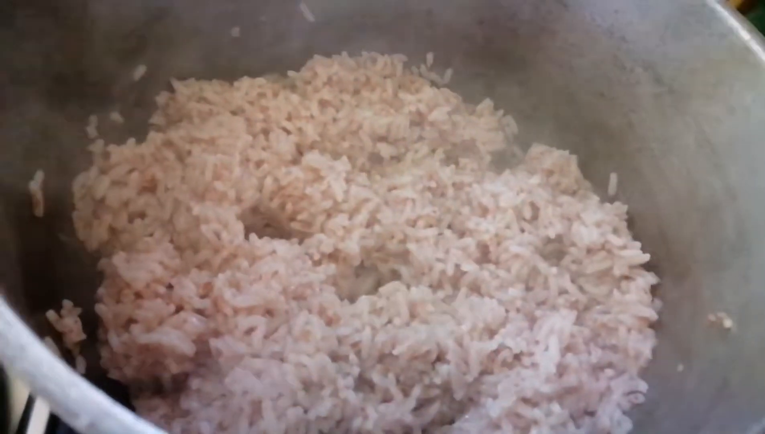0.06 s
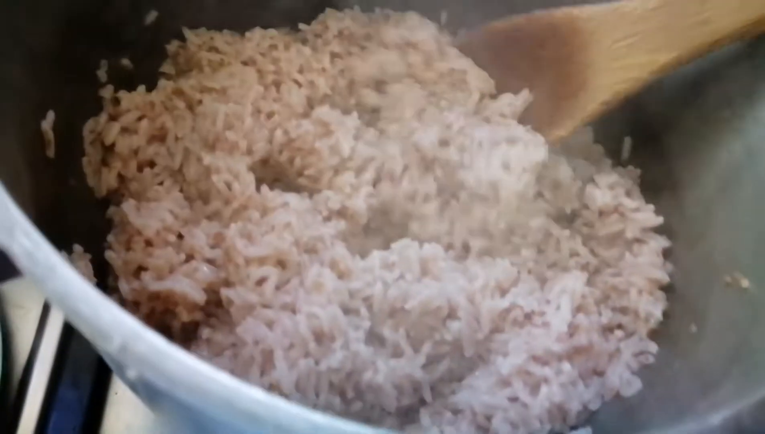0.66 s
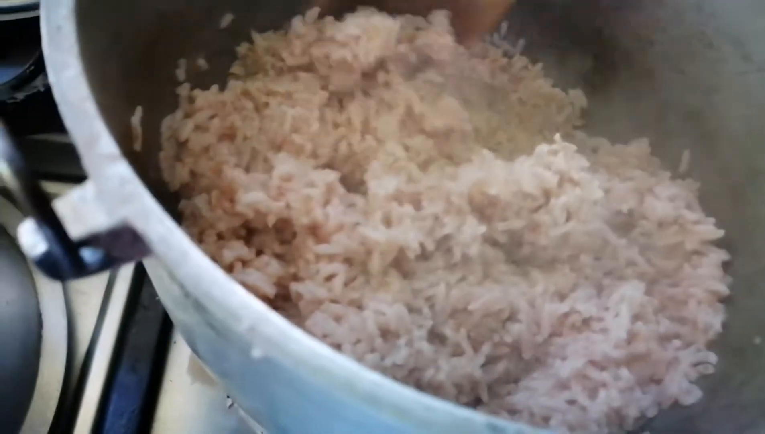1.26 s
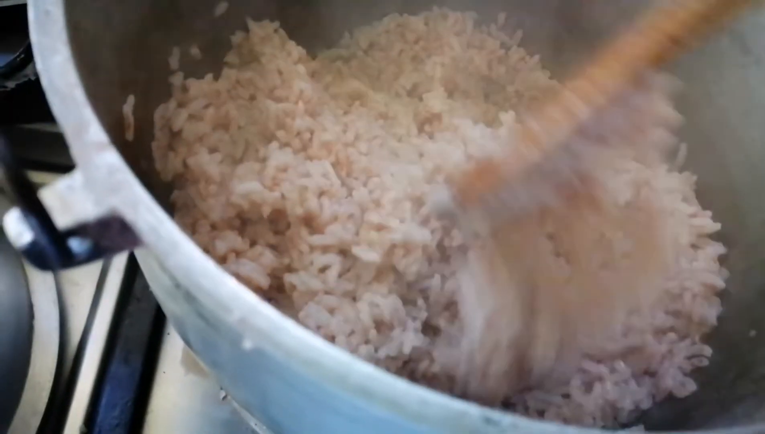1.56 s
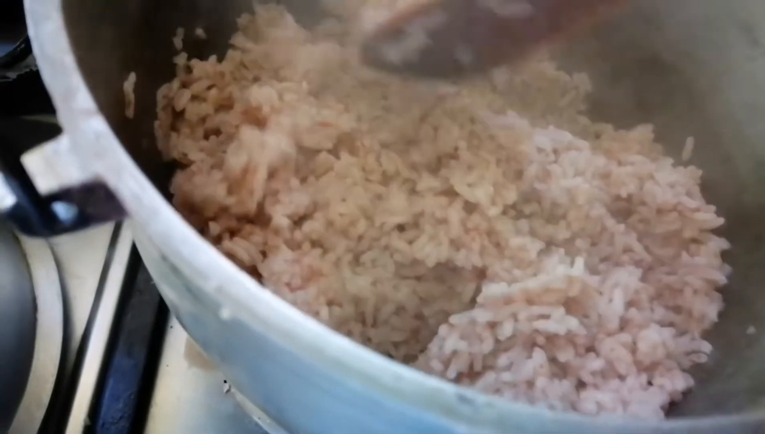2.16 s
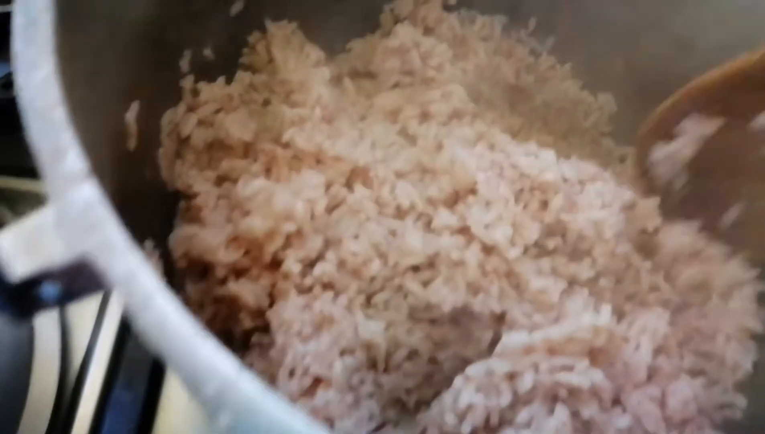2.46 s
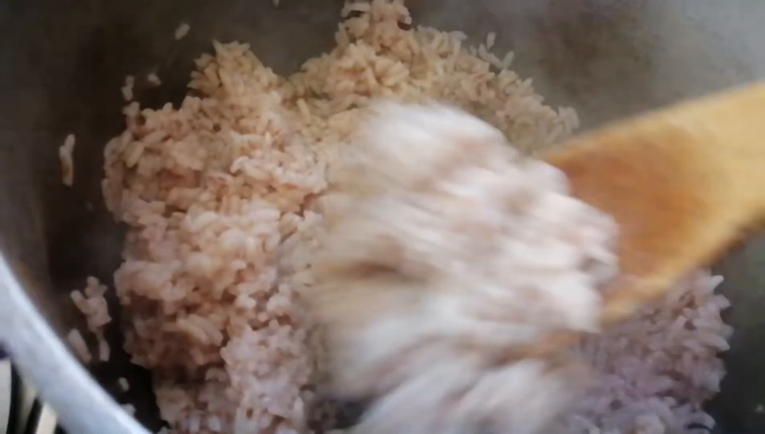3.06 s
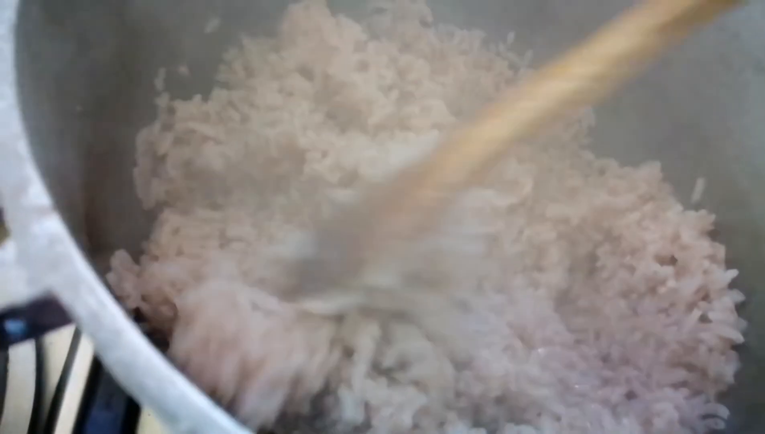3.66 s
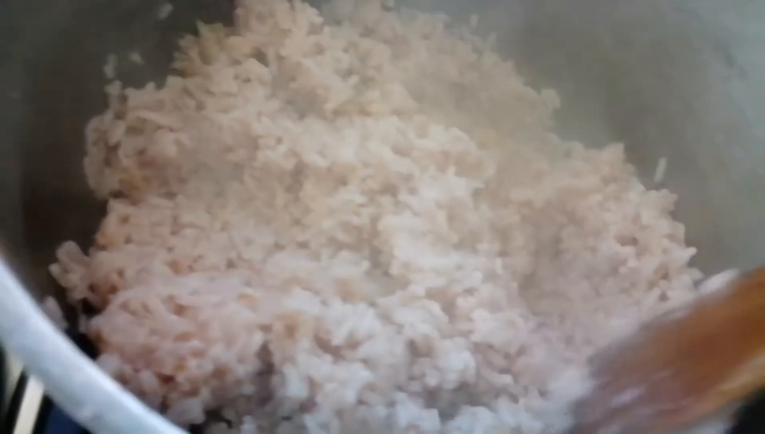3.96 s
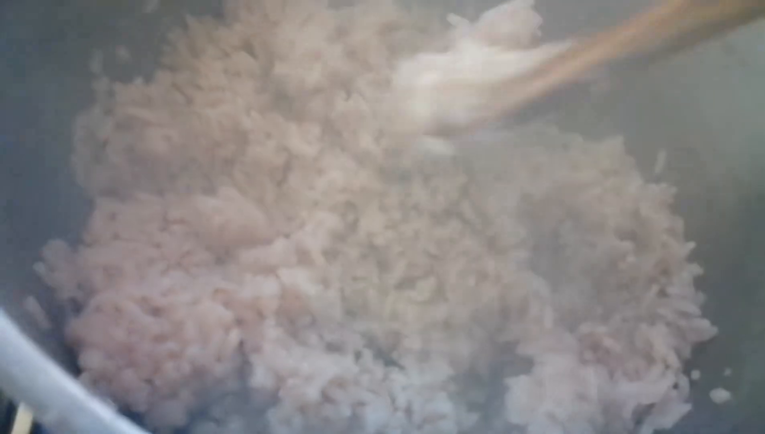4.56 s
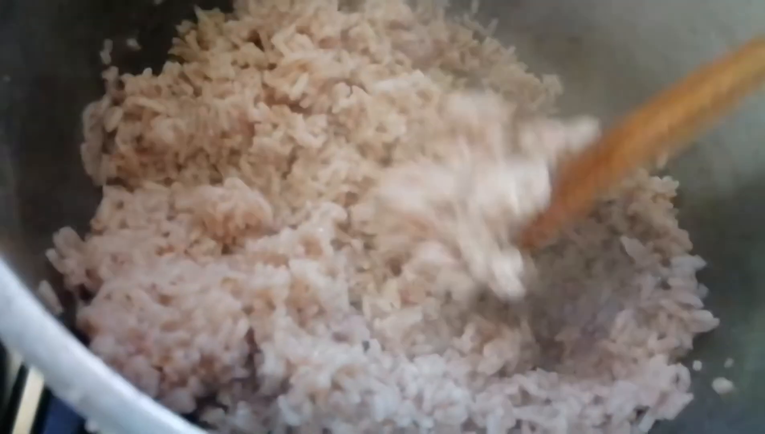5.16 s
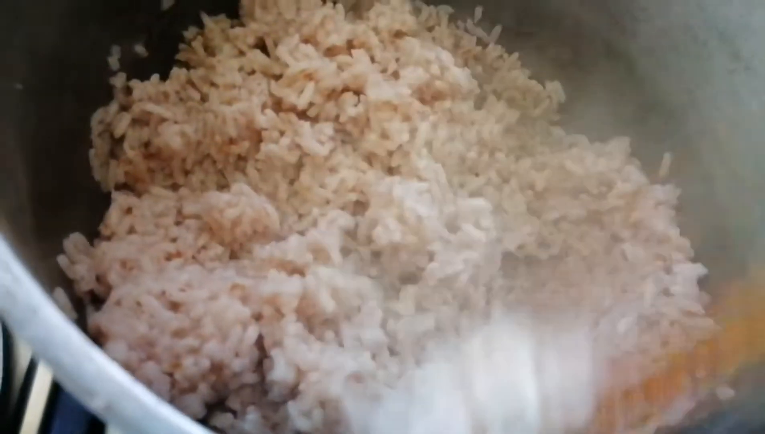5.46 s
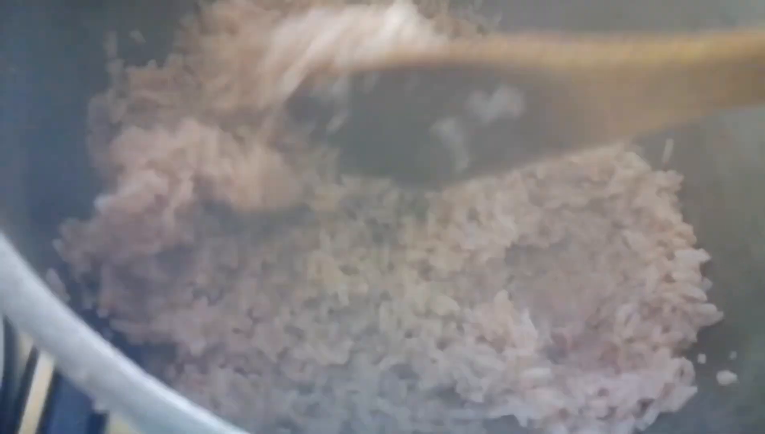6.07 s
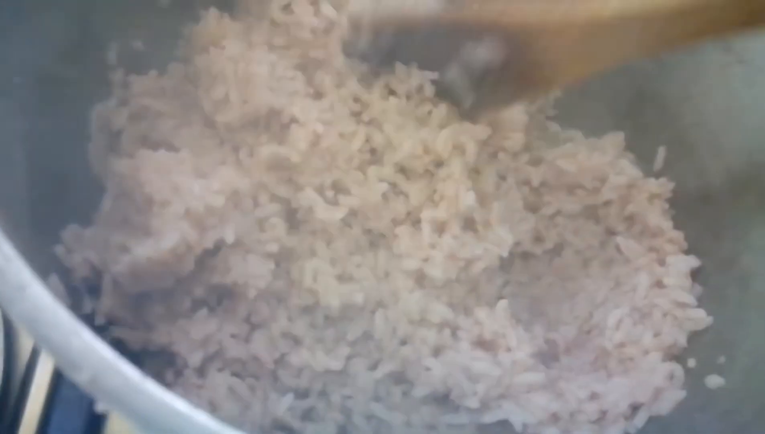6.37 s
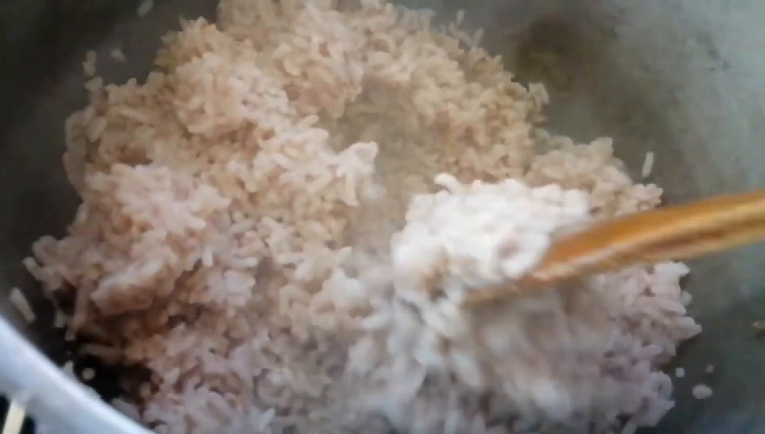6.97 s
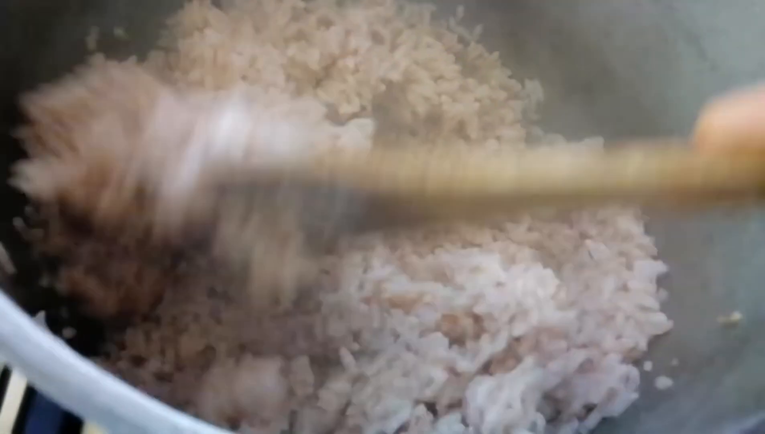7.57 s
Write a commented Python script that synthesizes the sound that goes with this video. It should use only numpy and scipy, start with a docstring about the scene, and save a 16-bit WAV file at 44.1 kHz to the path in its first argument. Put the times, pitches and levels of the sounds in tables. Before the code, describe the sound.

Damp rice sizzles in a large metal pot on a stove, a steady steamy hiss with fine crackle and small wet pops. A wooden spoon turns the rice, bumping the pot dully a few times. Just past the middle comes one sharp knock with a brief skid, and the hiss dips for a moment. Softer bumps and scrapes follow as the pot settles and the sputter eases slightly. The microphone is close to the pot.

```python
"""Damp rice sizzles in a large metal pot on a stove, close to a pair of microphones.
From the start, steam and bursting droplets lay a bed of hiss, dotted with wet pops of starch.
A wooden spoon turns the rice, bumping the pot at 0.3, 2.0 and 2.5 s. At 4.8 s one hard knock skids
along the wall and makes the gain control duck. Softer bumps and scrapes follow, the pot rocks and
settles, and the sputter keeps easing off as the rice dries."""
import sys
import numpy as np
from scipy import signal
from scipy.fft import rfft, irfft
from scipy.io import wavfile
from scipy.ndimage import uniform_filter1d

SR = 44100
rng = np.random.default_rng(int(sys.argv[2]) if len(sys.argv) > 2 else 0)


def to_wav(s):
    """Save 16-bit WAV."""
    ch = np.atleast_2d(s).T  # columns
    pcm = np.round(np.clip(ch, -1, 1) * 32767)  # PCM
    wavfile.write(sys.argv[1], SR, pcm.astype(np.int16))


N = 344421
TIME, FREQS = np.arange(N) / SR, np.fft.rfftfreq(N, 1 / SR)
RIGHT_MIC_LAG_S = 22 / SR

# The broad tone of the hiss. Each row: frequency in Hz, left and right density in dB per Hz.
HISS_TONE = [(25.0, -94.5, -107.5), (103, -92, -96), (300.0, -95.5, -102.4), (730, -91.5, -95),
             (1320, -88, -96.5), (2240, -88, -94), (3800, -85, -93), (4860, -78.5, -89),
             (6330, -79.5, -83.5), (7560, -82.0, -89.5), (9520, -83.5, -97.5), (10570, -90, -99.8),
             (14100, -99.5, -102.2), (15400, -96.5, -101.5)]
# Resonances and notches of the pot's hollow and the microphone ports.
# Each row: centre in Hz, width in Hz, left and right gain in dB.
HOLLOW_RESONANCES = [(144.4, 43, 4.5, 3.5), (397, 46, 4.5, -5), (532.7, 11.4, 9.5, 6.5), (720, 71, 0, 0.5),
                     (1050, 106, 3, 3.5), (1200, 140, -2.5, 1), (1480, 55, 3.5, -3), (1680, 260, 0.5, -0.5),
                     (1878, 130, 5, -3.5), (1980, 250, -3, 3.5), (2650, 67, -5, -6.5), (2740, 450, 6.5, 5),
                     (2998, 78, 5.5, 0), (3300, 750, 3, 6.5), (3860, 290, -2.5, 0.5), (4320, 450, 2.5, 3.5),
                     (4570, 130, -2.5, -0.5), (4790, 300, 2, 2.5), (5080, 55, 7.5, -1), (5400, 116, 4, 6),
                     (6460, 200, -2, -3), (7030, 780, 3.5, 9.5), (8360, 1060, 9, 0.5), (9400, 380, -2.5, 2),
                     (9750, 700, 0, 2.5)]
# How alike the steam is at both microphones. Each row: frequency in Hz, likeness from 0 to 1.
STEAM_LIKENESS = [(30, .5), (170, .85), (450, .62), (850, .2), (1500, .45), (2500, .2), (4700, .28),
                  (6500, .06), (14000, .05)]
# The slow ride of the frying. Each row: time in seconds, level in dB, lean to the left in dB.
FRYING_RIDE = [(0, -0.2, 0.5), (0.45, 0.75, -1), (1.2, 0, 1.2), (2.4, 0, 1.3), (3.9, 0, 0.8), (5.4, 0.1, 0),
               (6.6, 0.5, 0.5), (7.8, 0.5, 0)]
# The sizzle flares where turned rice meets hot metal and ebbs under the spoon.
# Each row: middle in seconds, length in seconds, fizz gain in dB, sputter gain in dB.
STIR_SWELLS = [(0.933, 0.36, 1, 1), (1.165, 0.15, 1.5, 0), (1.514, 0.12, 1, 1.5), (1.65, 0.15, -.3, -2.5),
               (1.76, .12, 0, 0.5), (2.30, 0.075, .5, 1.7), (3.273, .26, 0, -1.5), (3.582, 0.091, 2, 1),
               (3.84, 0.35, -.3, -1.5), (5.42, .12, -0.2, -2), (5.55, 0.11, 1.5, 0),
               (6.106, 0.093, -1.2, -4), (6.31, 0.22, 1, -1.5), (7.194, 0.43, -0.3, 0.9),
               (7.45, 0.12, -2, -1), (7.588, 0.26, .2, 1.5)]
# Narrow dips in the sizzle's tone. Each row: centre in Hz, width in Hz, usual depth from 0 to 1.
DRIFTING_DIPS = [(696, 174, 0.55), (1227, 190, 0.27)]
# The largest wet pops of sticky rice. Each row: start in seconds, level in dB, pitch in Hz.
BIG_POPS = [(0.3116, -38, 2300), (0.3492, -40, 2300), (0.838, -35, 2700), (3.809, -43, 2400),
            (3.9841, -35.5, 1620), (4.1051, -39, 2190), (4.1958, -34, 2030), (4.661, -39, 2800),
            (5.155, -38, 2720), (5.3254, -37, 2760), (5.8552, -42, 1740), (5.9897, -36, 2600),
            (6.067, -42, 1750), (7.62, -46, 1660)]
# The ring of the loaded pot. Each row: pitch in Hz, left and right gain in dB, seconds to fall 60 dB.
RING_MODES = [(160.3, 2, -1, 0.29), (207.6, -5, -9.5, 0.314), (254.3, -5.5, -13, 0.13), (321, -8, -4, 0.14),
              (400, -6, -8, 0.12), (546, 0, -10, 0.16), (600, -9, 2, 0.1), (1096, -0.5, 11, 0.092),
              (1240, 0, -2, 0.03), (1660, 8, -5, 0.16), (2040, 22, -14, 0.055), (2490, 21, 2, 0.04),
              (2850, 5, -14, 0.05), (2950, 21, -13, 0.055)]
# The pot settles on the stove. Each row: start in seconds, strength in dB, pitch rise of the ring in Hz.
POT_ROCKS = [(4.902, -47.5, 6.5), (5.637, -51, 5), (6.822, -55, 1), (7.446, -53, 2.5), (7.492, -49, 0)]
# The spoon drags over metal and rice, with a row for every band a stroke excites.
# Each row: start in seconds, length in seconds, band gain in dB, lower and upper edge in Hz.
SPOON_SCRAPES = [(0.269, 0.064, 6, 540, 700), (1.96, 0.3, 3, 140, 330), (2.01, 0.1, 5, 450, 700),
                 (4.8217, 0.029, 10.5, 1900, 15000), (4.823, 0.013, 16, 1900, 3300),
                 (4.821, 0.026, 10, 4600, 5500), (4.825, 0.015, 21.5, 7740, 8750),
                 (4.8255, 0.011, 20, 10800, 15000), (5.543, 0.016, 12.5, 780, 1330),
                 (7.505, 0.19, 7, 140, 330), (7.517, 0.09, 1, 380, 1200)]
# The spoon hits the pot. Each row: start in seconds, strength in dB, contact brightness in Hz,
# tick level in dB, clack level in dB, clack pitch in Hz, thud in dB relative to the strength,
# thud pitch in Hz, pitch rise of the ring in Hz, share of the ring time that the resting spoon leaves.
SPOON_KNOCKS = [(0.261, -53, 650, -40, -50, 580, -5, 190, -0.5, 1.0),
                (2.023, -62, 600, -59, -51, 620, -2, 220, 1, 1.0),
                (2.4709, -44, 380, -28, -40, 1050, -18, 180, 2, 0.8),
                (4.8206, -49.5, 2100, -14.5, -34, 740, 3.5, 280, 5, 1.0),
                (5.5405, -46.5, 980, -35, -45.5, 483, -2.5, 210, 5, 0.87),
                (7.2684, -60, 1000, -50, -44, 470, 0, 210, 0, 0.92)]


def amp(db):
    return 10 ** (np.asarray(db) / 20)


def unit_rms(x):
    return x / np.sqrt(np.mean(x ** 2) + 1e-20)


def curve(table, hz, column=1):
    """One column of a table, joined by straight lines on a log-frequency axis."""
    table = np.array(table)
    return np.interp(np.log(hz + 1), np.log(table[:, 0]), table[:, column])


def add(mix, start_s, sound):
    part = mix[:, round(start_s * SR):][:, :sound.shape[-1]]
    part += sound[..., :part.shape[1]]


def band(x, low_hz, top_hz):
    return signal.sosfilt(signal.butter(2, [low_hz, top_hz], "band", fs=SR, output="sos"), x)


def wander(rate_hz):
    """Random modulation of unit size, from 3 Hz up to about the given rate."""
    spectrum = rfft(rng.standard_normal(N)) * (FREQS > 3) / (1 + (FREQS / rate_hz) ** 2)
    return unit_rms(irfft(spectrum, N))


def pot_hollow(x, size=2 ** 13):
    """Colours white sound as it travels out of the pot to each microphone."""
    hz = abs(np.fft.fftfreq(size, 1 / SR))
    db = np.array([curve(HISS_TONE, hz, column=1), curve(HISS_TONE, hz, column=2)])
    for centre, width, left, right in HOLLOW_RESONANCES:
        db += np.array([[left], [right]]) / (1 + (2 * (hz - centre) / width) ** 2)
    minimum_phase = np.exp(np.conj(signal.hilbert(np.log(amp(db)))))
    taps = np.fft.ifft(minimum_phase).real[:, :size // 2]
    return signal.oaconvolve(x, taps * np.sqrt(SR / 2), axes=1)[:, :N]


def wall_bounces(t60, direct):
    """The path from one spot: a direct click, later on the right, and scatter between the walls."""
    t = TIME[:SR // 10]
    taps = rng.standard_normal((2, len(t))) * amp(-60 * t / t60)
    taps /= np.linalg.norm(taps, axis=1, keepdims=True)
    taps[0, 0] += direct
    taps[1, round(RIGHT_MIC_LAG_S * SR)] += direct
    return taps / np.hypot(1, direct)


def drifting_dips(x, drift=.05, depth_spread=.4, knots_per_s=5):
    """Narrow dips in the sizzle near 700 and 1230 Hz that slide, deepen and fill in."""
    for hz, width, depth in DRIFTING_DIPS:
        knots = rng.standard_normal((2, (N // SR + 1) * knots_per_s + 1))
        slide, fade = (np.interp(TIME * knots_per_s, np.arange(len(row)), row) for row in knots)
        carrier = np.exp(2j * np.pi * np.cumsum(hz * (1 + drift * slide)) / SR)
        pole = np.exp(-np.pi * width / SR)
        dip_band = 2 * (carrier * signal.lfilter([1 - pole], [1, -pole], x / carrier)).real
        x = x - np.clip(depth + depth_spread * fade, 0, 1) * dip_band
    return x


def steam():
    """A smooth rush of vapour, partly alike at the two microphones."""
    left, unrelated = rfft(rng.standard_normal((2, N)))
    likeness = curve(STEAM_LIKENESS, FREQS)
    lag = np.exp(-2j * np.pi * FREQS * RIGHT_MIC_LAG_S)
    right = likeness * left * lag + np.sqrt(1 - likeness ** 2) * unrelated
    return irfft(np.array([left, right]), N)


def droplets(per_s, clump_db, t60, direct, spread_db=3.5, spots=12):
    """Droplets burst in spurts at several spots on the hot metal; most are tiny, a few are large."""
    rate = per_s * amp(clump_db * wander(rate_hz=40))
    size = amp(spread_db * np.minimum(rng.exponential(1, N), 4.5)) * rng.choice([-1, 1], N)
    clicks = size * (rng.random(N) < rate / SR)
    spot = rng.integers(0, spots, N)
    crackle = sum(signal.oaconvolve((clicks * (spot == k))[None], wall_bounces(t60, direct), axes=1)
                  for k in range(spots))
    return unit_rms(crackle[:, :N])


def stir_swells():
    """Stirring rides the fizz and the sputter up and down in smooth humps, given in dB."""
    gains_db = 0
    for middle_s, length_s, fizz_db, sputter_db in STIR_SWELLS:
        hump = np.cos(np.pi * np.clip((TIME - middle_s) / length_s, -.5, .5)) ** 2
        gains_db += np.outer([fizz_db, sputter_db], hump)
    return gains_db


def sizzle(fizz_above_hz=4400, sputter_above_hz=900, steam_db=-2, wet_db=1.2, drying_db_per_s=.19):
    """Water boils off hot metal: steam throughout, fine fizz on top, and wet sputter that dries off."""
    times, level_db, lean_db = np.transpose(FRYING_RIDE)
    pan_db = np.array([[.5], [-.5]]) * np.interp(TIME, times, lean_db)
    flicker_db = .5 * wander(rate_hz=23) + .39 * wander(rate_hz=18)
    heat = amp(np.interp(TIME, times, level_db) + pan_db + flicker_db)
    fizz_swell_db, sputter_swell_db = stir_swells()
    wetness = amp(wet_db - drying_db_per_s * TIME + sputter_swell_db + .5 * wander(rate_hz=14))
    rush = steam()
    # The finest bursts reach the microphones mostly by way of the walls.
    fizz = amp(steam_db) * rush + amp(-5) * droplets(per_s=2600, clump_db=2.2, t60=.022, direct=.42)
    sputter = amp(steam_db) * rush + amp(-3) * droplets(per_s=1400, clump_db=1.2, t60=.05, direct=.65)
    below_sputter = 1 / (1 + (FREQS / sputter_above_hz) ** 6)
    below_fizz = 1 / (1 + (FREQS / fizz_above_hz) ** 6)
    lows = rfft(rush) * below_sputter
    mids = rfft(heat * wetness * sputter) * (below_fizz - below_sputter)
    highs = rfft(heat * amp(fizz_swell_db) * fizz) * (1 - below_fizz)
    return irfft(lows + mids + highs, N)


def blip(hz, cycles_to_peak, t60, direct):
    """A few cycles that swell and die, with their scatter inside the pot."""
    cycles = TIME[:SR // 25] * hz
    envelope = (cycles / cycles_to_peak * np.exp(1 - cycles / cycles_to_peak)) ** 2
    wave = envelope * np.sin(2 * np.pi * cycles)
    return signal.fftconvolve(wave[None], wall_bounces(t60, direct), axes=1)


def starch_pops(small_per_s=1.5, small_db=-46, small_hz=1900, spread_octaves=.37):
    """Bubbles of starch burst, off to the left: large ones on cue and small ones at random."""
    out = np.zeros((2, N))
    draws = rng.uniform(-1, 1, (round(small_per_s * N / SR), 2))
    small_pops = [(abs(when) * TIME[-1], small_db, small_hz * 2 ** (spread_octaves * pitch))
                  for when, pitch in draws]
    for start_s, db, hz in BIG_POPS + small_pops:
        add(out, start_s, amp(db) * blip(hz, cycles_to_peak=1.3, t60=.05, direct=1.2))
    return out * amp([[4], [-5]])


def pot_ring(bright_hz, shift_hz, ring_share=1, build_cycles=2.7):
    """Low modes bloom last; a soft contact leaves the high ones quiet, and pressure lifts the pitch."""
    t, ring = TIME[:SR // 2], 0
    for hz, left_db, right_db, t60 in RING_MODES:
        attack = 1 - np.exp(-(t * hz / build_cycles) ** 4)
        decay = amp(np.array([[left_db], [right_db]]) - 60 * t / (t60 * ring_share))
        softening = np.hypot(1, (hz / bright_hz) ** 2)
        ring += attack * decay / softening * np.sin(2 * np.pi * (hz + shift_hz) * t)
    return ring


def stove_thud(hz, ring_share=1, rise_s=.013, t60=.3):
    """The pot shakes dully on the stove, in a broad band around hz."""
    t = TIME[:SR // 2]
    envelope = (1 - np.exp(-(t / rise_s) ** 2)) * amp(-60 * t / (t60 * ring_share))
    rumble = unit_rms(band(rng.standard_normal(len(t)), hz / 1.5, hz * 1.5))
    return amp([[0], [-5]]) * envelope * rumble


def pot_rocks(bright_hz=184, thud_db=-13, thud_hz=190):
    """The pot drops back on its support with a soft bump that rings mainly its lowest modes."""
    out = np.zeros((2, N))
    for start_s, db, shift_hz in POT_ROCKS:
        bump = pot_ring(bright_hz, shift_hz) + amp(thud_db) * stove_thud(thud_hz)
        add(out, start_s, amp(db) * bump)
    return out


def spoon_scrapes(grit_db=3.5):
    """Wood slips in a run of tiny catches that swells quickly and dies more slowly."""
    out = np.zeros((2, N))
    grit = amp(grit_db * wander(rate_hz=170))
    for start_s, length_s, db, low_hz, top_hz in SPOON_SCRAPES:
        friction = rng.standard_normal((2, SR // 4))[:, :round(length_s * SR)]  # 0.25 s at most
        envelope = np.sin(np.pi * np.linspace(0, 1, friction.shape[1]) ** .6)
        add(out, start_s, amp(db) * band(friction, low_hz, top_hz) * envelope)
    return out * grit


def spoon_knocks(tick_hz=2600):
    """Each hit layers a tick, a dull wooden clack, the damped pot's ring and its thud on the stove."""
    out = np.zeros((2, N))
    for (start_s, db, bright_hz, tick_db, clack_db, clack_hz,
         thud_db, thud_hz, shift_hz, ring_share) in SPOON_KNOCKS:
        tick = amp([[0], [-11]]) * blip(tick_hz, cycles_to_peak=1, t60=.025, direct=1.2)
        clack = amp([[0], [-3]]) * blip(clack_hz, cycles_to_peak=1.3, t60=.044, direct=.9)
        body = pot_ring(bright_hz, shift_hz, ring_share) + amp(thud_db) * stove_thud(thud_hz, ring_share)
        add(out, start_s, amp(tick_db) * tick + amp(clack_db) * clack)
        add(out, start_s, amp(db) * body)
    return out


def scene():
    """Sizzle and scrapes sound through the hollow of the pot; knocks, bumps and pops sit on top."""
    bed = pot_hollow(drifting_dips(sizzle()) + spoon_scrapes())
    return bed + spoon_knocks() + pot_rocks() + starch_pops()


def record(dry):
    """Gain control ducks after a loud hit and recovers; a steep low-pass trims the very top."""
    threshold_db, duck_share, attack_s, release_db_per_s = -34, .55, .009, 30
    power_db = 10 * np.log10(abs(uniform_filter1d((dry ** 2).mean(0), size=300)) + 1e-12)
    fall_db = TIME * release_db_per_s
    held_peak_db = np.maximum.accumulate(power_db + fall_db) - fall_db
    over_db = np.maximum(held_peak_db - threshold_db, 0)
    pole = np.exp(-1 / (attack_s * SR))
    ducked = dry * amp(-duck_share * signal.lfilter([1 - pole], [1, -pole], over_db))
    low_pass = signal.firwin(1023, cutoff=15180, window=("kaiser", 9), fs=SR)
    return signal.oaconvolve(ducked, low_pass[None], "same")


dry = scene()
out = record(dry)
to_wav(out)
```